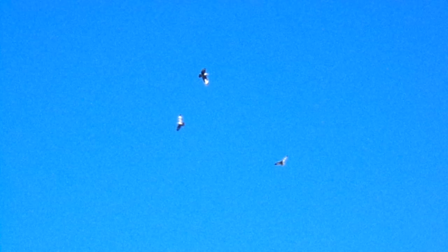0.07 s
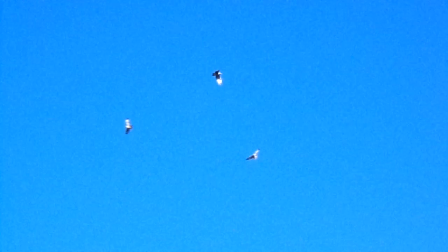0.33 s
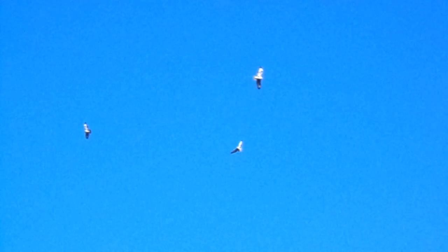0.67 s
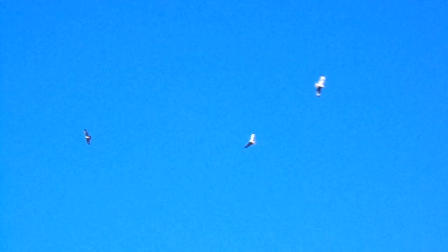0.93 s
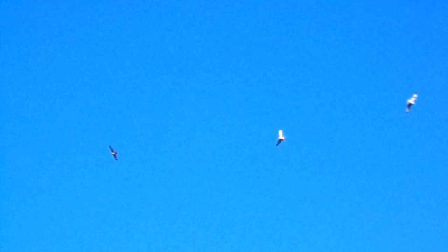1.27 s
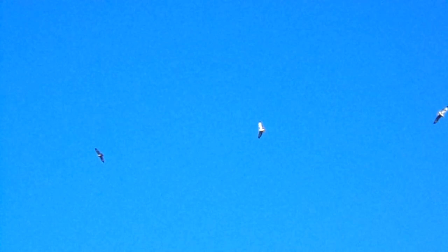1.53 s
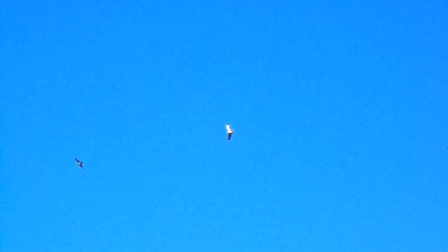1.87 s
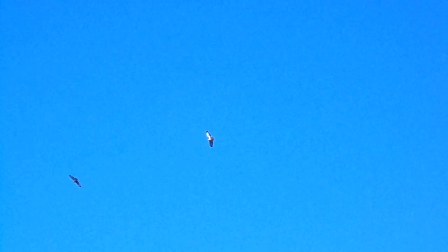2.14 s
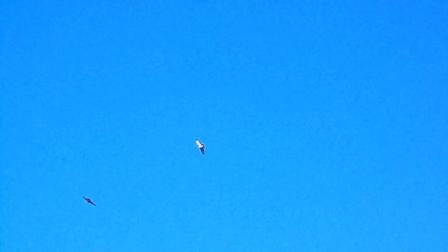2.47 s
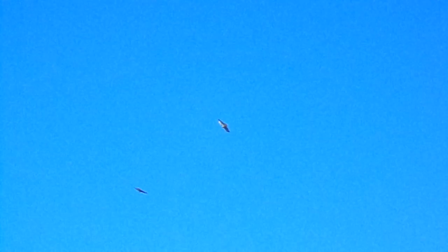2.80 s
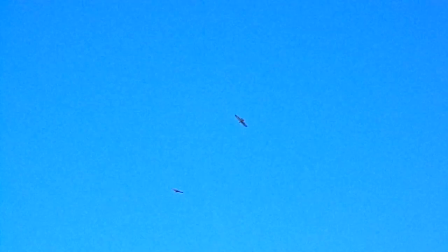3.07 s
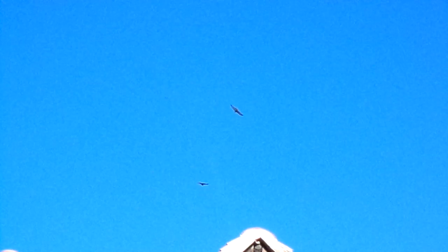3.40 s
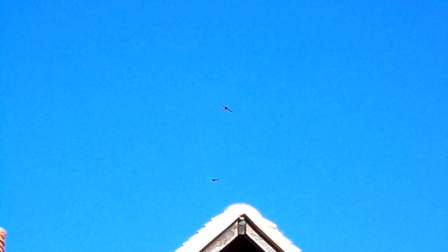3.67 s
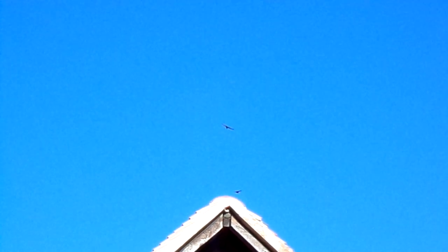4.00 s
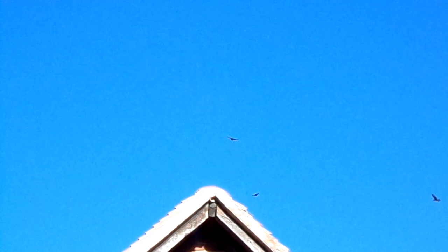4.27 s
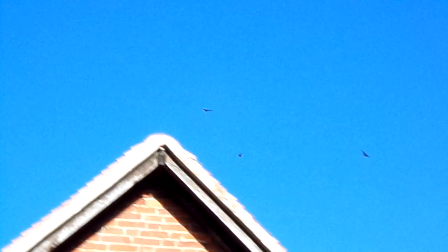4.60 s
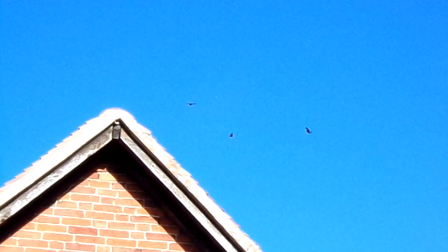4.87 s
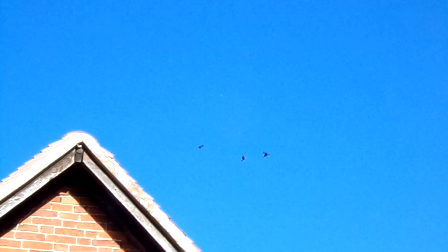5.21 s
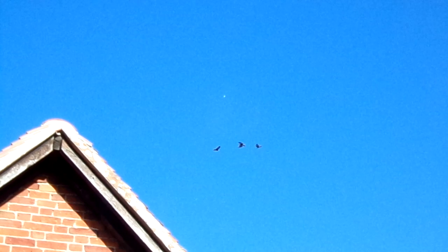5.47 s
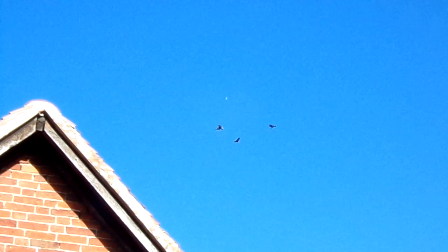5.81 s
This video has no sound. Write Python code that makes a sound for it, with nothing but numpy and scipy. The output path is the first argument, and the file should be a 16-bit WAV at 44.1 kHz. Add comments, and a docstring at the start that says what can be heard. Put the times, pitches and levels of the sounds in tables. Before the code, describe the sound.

Faint chirps and high whistles of small birds in a garden, over a steady far traffic hush and a few handling ticks.

```python
"""Thin bird whistles fade in over the steady hush of distant traffic in a garden; then one small bird
sings a tumbling phrase that ends in a trill. Each note is a gliding tone of the syrinx, echoed by walls
and trees. Fingers tick on the hand-held camera's plastic shell and once make it clack, exciting its
modes, and its body thuds softly in the grip. All this, with a faint hiss, passes fixed notch filters."""
import sys
import numpy as np
from scipy import signal
from scipy.fft import rfft, irfft, next_fast_len
from scipy.io import wavfile
from scipy.ndimage import uniform_filter1d, map_coordinates

SR = 44100
rng = np.random.default_rng(int(sys.argv[2]) if len(sys.argv) > 2 else 0)


def master_out(mix):
    """Clip the mix to full scale and print it as 16-bit PCM to the path in sys.argv[1]."""
    frames = np.transpose(np.atleast_2d(mix))
    ceiling = np.clip(frames, -1, 1)
    pcm = np.round(ceiling * 32767).astype(np.int16)
    wavfile.write(sys.argv[1], SR, pcm)


N = 257984


def amp(db):
    """Amplitude ratio of a level in decibels."""
    return 10 ** (np.asarray(db) / 20)


def unit(x):
    """Normalisation to an rms of 1."""
    return x / np.sqrt(np.mean(x ** 2) + 1e-20)


def along(points, hz):
    """Interpolation of (Hz, value) points on a logarithmic frequency axis."""
    f, v = np.transpose(points)
    return np.interp(np.log(hz + 1), np.log(f + 1), v)


def bells(rows, x):
    """Sum of Gaussian curves, each given by centre, width and height."""
    return sum(height * np.exp(-((x - centre) / width) ** 2) for centre, width, height in rows)


def wobble(rate, size=N):
    """Smooth random modulation: a spline through rate knots a second."""
    knots = rng.standard_normal(int(size * rate / SR) + 4)
    return map_coordinates(knots, [np.arange(size) * rate / SR])


def filtered(x, response):
    """Linear filtering: the spectrum is multiplied by a complex frequency response."""
    m = next_fast_len(len(x) + 8192)
    return irfft(rfft(x, m) * response(np.fft.rfftfreq(m, 1 / SR)), m)[:len(x)]


def noise(colour_db):
    """Spectral shaping of white noise by a curve in dB, scaled to an rms of 1."""
    return unit(filtered(rng.standard_normal(N), lambda hz: amp(colour_db(hz))))


def add(track, s, sound):
    """Superposition of a sound on the track, starting at s seconds."""
    part = track[max(round(s * SR), 0):][:len(sound)]
    part += sound[:len(part)]


def hiss():
    """Self-noise of the microphone: a thin hiss, above which a faint sizzle comes and goes."""
    # Spectrum of the hiss. Each row: frequency in Hz, relative density in dB.
    spectrum = [(3000, -10), (7000, -12.5), (8800, -3), (10200, -11.5), (12000, -4), (15500, 2)]
    # Spells of sizzle. Each row: start in seconds, end in seconds, level in dB.
    spells = [(2.28, 3.06, -71), (5.22, 5.33, -72)]
    edge_db_per_s = 50
    t = np.arange(N) / SR
    envelope = sum(amp(db - edge_db_per_s * np.abs(t - np.clip(t, start, end)))
                   for start, end, db in spells)
    sizzle = noise(lambda hz: along([(9000, -41), (12000, -15), (14500, -4), (15600, -2.5)], hz))
    return amp(-74 + 0.59 * wobble(1.87)) * noise(lambda hz: along(spectrum, hz)) + envelope * sizzle


def traffic():
    """Broadband noise of far roads: rumble, tyre roar and a resonant drone swell and slowly recede."""
    # Spectrum of the hush. Each row: frequency in Hz, relative density in dB.
    spectrum = [(20, -27), (35, -19), (62, -5), (95, -6.5), (160, -2.5), (280, -9), (480, -8), (640, -1.5),
                (1000, -0.5), (1350, -3.5), (2300, -14.5), (4800, -24), (7200, -36), (10000, -86)]
    # Its hollow resonances. Each row: centre in Hz, width in Hz, lift in dB.
    hollows = [(603, 38.5, 6.5), (802.4, 22.5, 1.5)]
    # Swells. Each row: time and half-width in seconds, then lifts of rumble, roar and drone in dB.
    swells = [(.95, 0.22, 0.5, -1, 5), (2.1, 0.2, 0, .7, 1), (3.05, 0.34, 0, 1.6, 5),
              (4.25, 0.36, 1.5, 0.86, -2.5), (5.85, 0.28, 0, .3, 7.5)]
    t = np.arange(N) / SR
    rumble_lift, roar_lift, drone_lift = sum(np.outer(lifts, bells([(s, width, 1)], t))
                                             for s, width, *lifts in swells)
    rumble_db = -55.5 - 0.47 * t + rumble_lift
    roar_db = -46.5 - 0.32 * t + roar_lift
    drone_db = -51 - 1.3 * t + drone_lift
    colour = lambda hz: along(spectrum, hz) + bells(hollows, hz)
    rumble = noise(lambda hz: colour(hz) + along([(330, -4), (650, -25.5)], hz))
    roar = noise(lambda hz: colour(hz) + along([(220, -26.5), (430, -2)], hz))
    drone = noise(lambda hz: -20 * np.log10(1 + ((hz - 780) / 42) ** 2))
    return (amp(rumble_db + 0.4 * wobble(7.7)) * rumble
            + amp(roar_db + 0.48 * wobble(9)) * roar
            + amp(drone_db) * drone)


def bumps():
    """Damped oscillation: the camera body gives a dull thud as the grip shifts."""
    # Each row: start in seconds, frequency in Hz, level in dB, time to decay by 60 dB in seconds.
    thuds = [(3.657, 183, -42.5, 0.19), (4.428, 317, -46.5, 0.074), (4.43, 160, -45, 0.11)]
    out, t = np.zeros(N), np.arange(SR // 4) / SR
    attack = 1 - np.exp(-t / 0.0024)
    for s, hz, db, t60 in thuds:
        add(out, s, amp(db - 60 * t / t60) * attack * np.sin(2 * np.pi * hz * t))
    return out


def contact(centre_hz, hardness_hz, ring_db):
    """Impact excitation: an impulse and a brief scrape make a tick, and the shell's modes ring."""
    # Shell modes. Each row: frequency in Hz, relative level in dB, time to decay by 60 dB in seconds.
    modes = [(1030, -16, 0.035), (1592, -14.5, 0.013), (1950, -14.5, 0.025), (3270, -14, 0.022),
             (4620, -9, 0.021), (4770, -2.5, 0.012), (5150, -2.5, 0.0168), (6140, -10.5, 0.01),
             (6810, -13, 0.011)]
    t = np.arange(SR // 16) / SR
    push = 0.219 * rng.standard_normal(len(t)) * amp(-60 * t / 0.0089)
    push[0] += 1
    tick = signal.lfilter(*signal.iirpeak(centre_hz, Q=1.9, fs=SR), push)
    tick = signal.lfilter(*signal.butter(1, hardness_hz, fs=SR), tick)
    ring = sum(amp(db + rng.normal(0, 5.3) - 60 * t / t60) * np.sin(2 * np.pi * (hz * t + rng.random()))
               for hz, db, t60 in modes)
    ring *= 1 - np.exp(-t / 0.00014)
    return tick / np.abs(tick).max() + amp(ring_db) * ring / np.abs(ring).max()


def handling():
    """Resonance and rebound: ticks near the shell's pitch ring it most; a double clack chatters."""
    # Finger ticks. Each row: start in seconds, level in dB, centre in Hz, hardness as a cut-off in Hz.
    ticks = [(1.213, -36.5, 3930, 5000), (1.254, -38, 5200, 5000), (1.342, -52, 4900, 5000),
             (1.42, -45, 5600, 6000), (1.647, -41.5, 8100, 14000), (1.778, -47, 12000, 14000),
             (1.857, -30.5, 3500, 3000), (1.94, -34.5, 3860, 2000), (2.537, -39, 6000, 12000),
             (2.798, -24.5, 6350, 14500), (2.798, -33, 2220, 4000), (2.942, -33.5, 4660, 3000),
             (3.6066, -29.5, 5170, 4000), (3.657, -41.5, 5500, 5000), (4.401, -34.5, 3950, 2200),
             (4.4276, -24.5, 2090, 4000), (4.523, -38, 4370, 4000), (5.419, -40.5, 4100, 4000)]
    # The clack's two blows. Each row: start in seconds, level in dB, centre in Hz.
    clacks = [(3.611, -18, 5600), (3.618, -19, 4770)]
    shell_hz, ring_loss_db_per_octave = 4800, 34
    rebound_gap_s, rebound_loss_db, rebound_pitch_ratio = 0.0032, 4.5, 0.59
    out = np.zeros(N)
    for s, db, hz, hardness_hz in ticks:
        ring_db = -2 - ring_loss_db_per_octave * abs(np.log2(hz / shell_hz))
        add(out, s, amp(db) * contact(hz, hardness_hz, ring_db))
    for s, db, hz in clacks:
        for k in range(3):
            blow = contact(hz * rebound_pitch_ratio ** k, hardness_hz=2300, ring_db=1)
            add(out, s + rebound_gap_s * k, amp(db - rebound_loss_db * k) * blow)
    # The case muffles the band around 10 kHz.
    return filtered(out, lambda hz: amp(bells([(10200, 2000, -14)], hz)))


def garden(x, t60, gap_s):
    """Reverberation: house walls and trees scatter a decaying tail that arrives after a gap."""
    t = np.arange(SR) / SR
    tail = rng.standard_normal(SR) * amp(-60 * t / t60) * np.clip(t / gap_s - .5, 0, 1)
    return signal.fftconvolve(x, tail / np.linalg.norm(tail))[:N]


def walls(x, spread_s):
    """Interference: eight early reflections break a gliding tone into flickers."""
    taps = np.zeros(SR // 4)
    for when, size in rng.random((8, 2)):
        taps[int((.003 + spread_s * when) * SR)] += (0.18 + size) * rng.choice([-1, 1])
    return signal.fftconvolve(x, taps / np.linalg.norm(taps))[:N]


def note(length, shape, crest, waver, flutter_db):
    """Frequency modulation: a syrinx tone glides through (share of the length, Hz) points."""
    u = np.linspace(0, 1, int(length * SR))
    glide = uniform_filter1d(np.interp(u, *np.transpose(shape)), size=len(u) // 8, mode="nearest")
    pitch = glide * (1 + waver * wobble(247, len(u)))
    swell = np.sin(np.pi * np.interp(u, [0, crest, 1], [0, .5, 1]))
    flutter = amp(flutter_db * wobble(80, len(u)))
    return np.sqrt(2) * swell * flutter * np.sin(2 * np.pi * np.cumsum(pitch) / SR)


def slurs(rows, waver, flutter_db):
    """Amplitude modulation: a fast, uneven tremor makes short sliding notes hoarse."""
    voice = np.zeros(N)
    for s, length, start_hz, end_hz, db in rows:
        shape = [(0, start_hz), (1, end_hz)]
        add(voice, s, amp(db) * note(length, shape, crest=0.53, waver=waver, flutter_db=flutter_db))
    return voice * unit(1 + .45 * wobble(900))


def far_birds():
    """Distant pips, whose reverberant sound is nearly as strong as the direct sound."""
    # Each row: start and length in seconds, first and last pitch in Hz, relative level in dB.
    calls = [(1.19, 0.094, 3130, 3220, -56.5), (2.95, 0.034, 3750, 3140, -58),
             (3.343, 0.047, 4850, 4730, -63), (3.433, 0.017, 4120, 4040, -63),
             (4.198, 0.023, 3710, 3310, -58), (4.673, 0.017, 4640, 5080, -61.5),
             (5.315, 0.044, 3800, 3250, -60)]
    voice = slurs(calls, waver=0.024, flutter_db=3.5)
    return amp(2) * voice + garden(voice, t60=0.18, gap_s=0.0049)


def whistlers():
    """Nearly pure syrinx tones, high and lightly echoed, in three contours: sliding, arched, level."""
    # Falling whistles. Each row: start and length in seconds, first pitch in Hz, level in dB.
    slides = [(2.025, 0.1, 7360, -59.5), (2.233, 0.12, 6930, -54.5), (2.853, 0.11, 6190, -45.5),
              (3.017, 0.095, 6150, -50.5), (5.638, .058, 6930, -62.5)]
    # Their contour. Each row: share of the length, ratio to the first pitch.
    slide_shape = [(0, 1), (.3, .92), (.6, .85), (.9, .825), (1, 0.58)]
    # Whistles that hang, then plunge. Each row: start and length in seconds,
    # pitch ceiling and depth of the plunge in Hz, level in dB.
    arches = [(2.522, 0.07, 7700, 3200, -56), (2.705, 0.075, 7390, 2550, -49.5),
              (3.252, .075, 7360, 1790, -54), (5.695, .095, 7870, 655, -53.5)]
    # Their contour. Each row: share of the length, share of the plunge.
    arch_shape = [(0, .22), (.2, 0.07), (.45, 0.11), (.7, .2), (.85, .52), (1, 1)]
    # Almost level whistles. Each row: start and length in seconds, pitch in Hz, level in dB.
    peeps = [(0.024, 0.06, 6150, -58), (0.102, .06, 7700, -55), (0.177, 0.13, 8200, -60.5),
             (0.301, 0.12, 8210, -64.5), (5.638, 0.043, 8170, -64.5)]
    peep_rise = 0.022  # share of the pitch
    voice = np.zeros(N)
    for s, length, hz, db in slides:
        shape = [(u, hz * ratio) for u, ratio in slide_shape]
        add(voice, s, amp(db) * note(length, shape, crest=0.64, waver=0.006, flutter_db=2.5))
    for s, length, top_hz, plunge_hz, db in arches:
        shape = [(u, top_hz - plunge_hz * share) for u, share in arch_shape]
        add(voice, s, amp(db) * note(length, shape, crest=0.95, waver=0.0084, flutter_db=3))
    for s, length, hz, db in peeps:
        shape = [(0, hz * (1 - peep_rise / 2)), (1, hz * (1 + peep_rise / 2))]
        add(voice, s, amp(db) * note(length, shape, crest=0.32, waver=0.0076, flutter_db=5))
    return voice + amp(-12) * walls(voice, spread_s=.025) + amp(-11) * garden(voice, t60=0.41, gap_s=0.018)


def trill(count):
    """Jittered repetition: rows of soft, overlapping slurs that swell, fade and sink in pitch."""
    start_s, crest_s, gap_s, jitter_s, length_s = 0.935, 1.02, 0.027, 0.006, 0.0363
    top_hz, bottom_hz, sag_hz_per_s = 3440, 2550, 620
    crest_db, fade_db_per_s = -51.5, 41
    rows = []
    for k, (late, sharp) in enumerate(rng.standard_normal((count, 2))):
        s = start_s + gap_s * k + jitter_s * late
        tuning = 1 + 0.0437 * sharp
        start_hz = top_hz - sag_hz_per_s * (s - start_s)
        db = crest_db - fade_db_per_s * abs(s - crest_s)
        rows.append((s, length_s, start_hz * tuning, bottom_hz * tuning, db))
    return rows


def songbird():
    """Quick downward sweeps of the syrinx tumble into a trill; reflections smear them together."""
    # The phrase. Each row: start in seconds, first and last pitch in Hz, relative level in dB.
    song = [(0.457, 5070, 4640, -48.5), (0.475, 5040, 3480, -43), (.502, 4670, 4050, -43),
            (0.535, 4210, 3230, -31), (.553, 3150, 2420, -38.5), (0.576, 3605, 2410, -42),
            (.602, 4030, 2740, -48.5), (.640, 4830, 4500, -44.5), (.657, 4240, 2520, -39.5),
            (.696, 4760, 4630, -54), (.743, 4620, 3880, -42.5), (.762, 3700, 2890, -44.5),
            (.812, 3430, 3080, -43), (0.852, 3540, 2630, -42.5), (.896, 3470, 2600, -45)]
    length_s = 0.018
    phrase = [(s, length_s, *rest) for s, *rest in song] + trill(count=10)
    voice = slurs(phrase, waver=0.0292, flutter_db=3)
    early = walls(voice, spread_s=.03)
    tail = garden(voice, t60=0.38, gap_s=0.0066)
    return amp(-2) * voice + amp(-8.5) * early + amp(-5) * tail


def scene():
    """Superposition, in mono, of the birds, the camera's own sounds and the far traffic."""
    return (songbird() + whistlers() + far_birds() + handling() + bumps() + traffic() + hiss())[None]


def record(dry):
    """A fade-in, then linear filtering: notches, a group delay of lows behind highs and a band limit."""
    # Notch filters. Each row: centre in Hz, width in Hz, gain in dB.
    notches = [(3725, 110, -25), (4265, 120, -19), (8000, 150, -12)]
    open_s, fade_end_s, fade_db_per_s = 0.036, 0.48, 53
    top_hz, lag_s = 15820, 0.0018  # the lag shrinks to none at the band limit
    t = np.arange(N) / SR
    fade = (t > open_s) * amp(fade_db_per_s * np.minimum(t - fade_end_s, 0))
    smear = lambda hz: np.exp(-2j * np.pi * lag_s * (hz - hz ** 2 / (2 * top_hz)))
    return filtered(dry[0] * fade, lambda hz: amp(bells(notches, hz)) * smear(hz) * (hz < top_hz))[None]


dry = scene()
out = record(dry)
master_out(out)
```